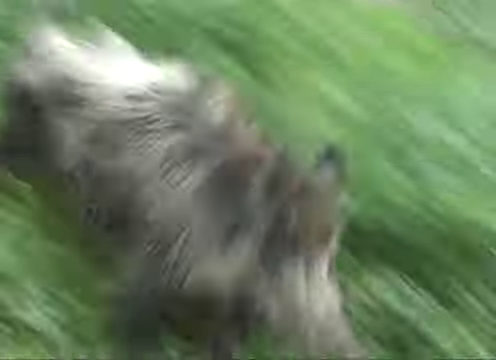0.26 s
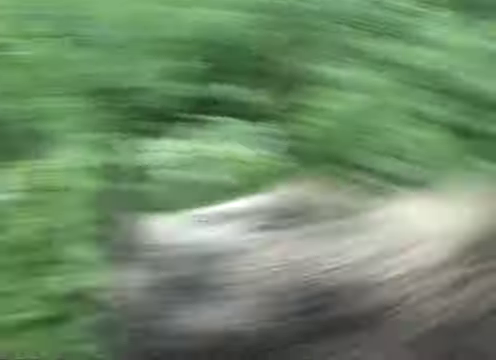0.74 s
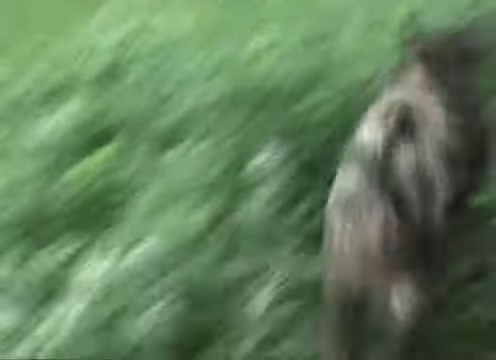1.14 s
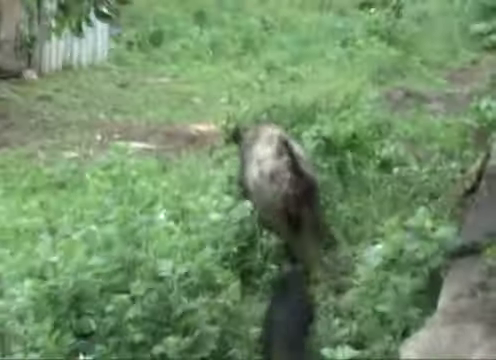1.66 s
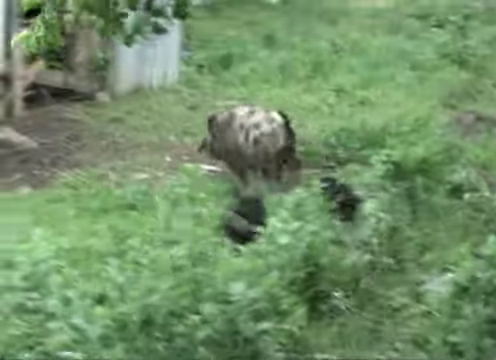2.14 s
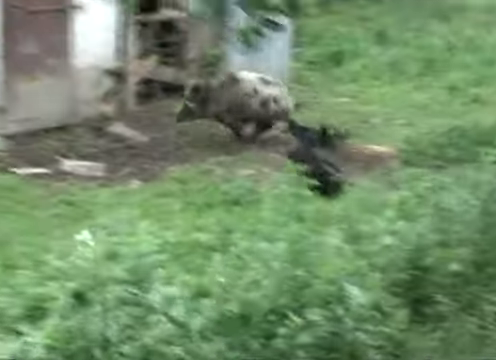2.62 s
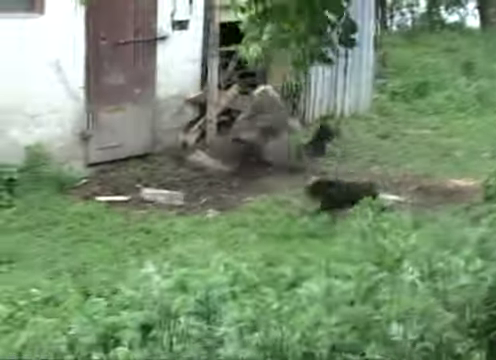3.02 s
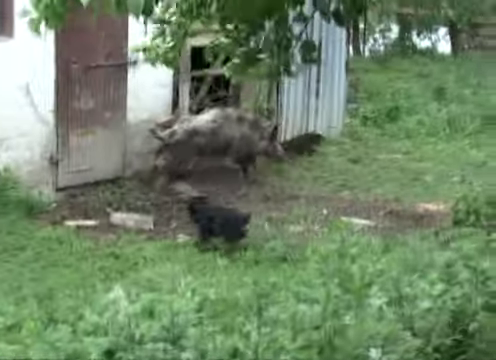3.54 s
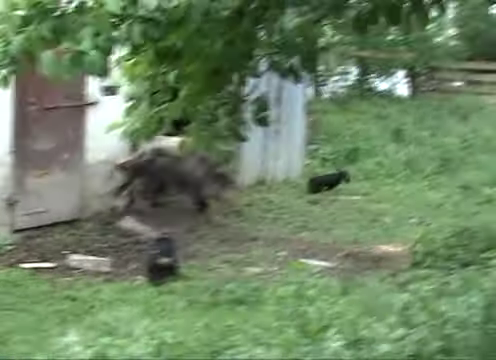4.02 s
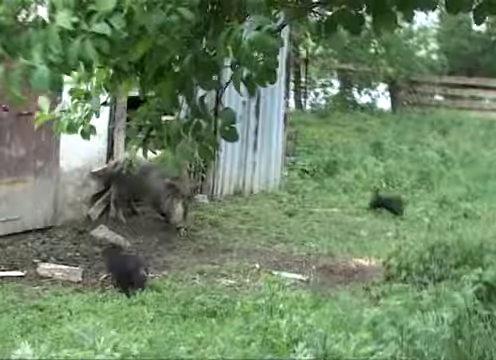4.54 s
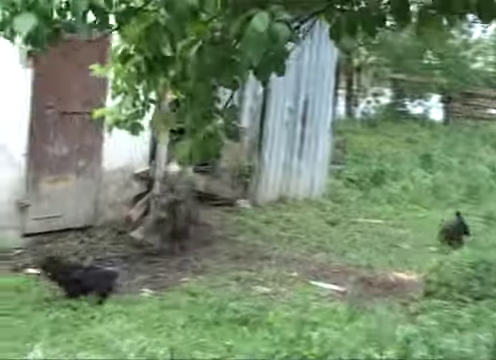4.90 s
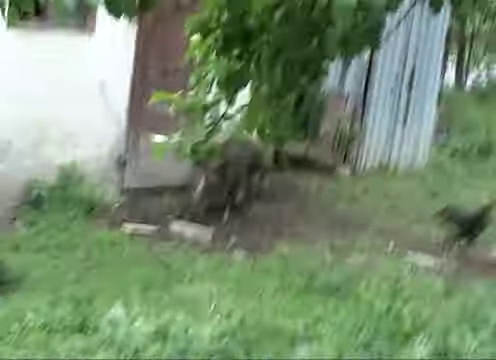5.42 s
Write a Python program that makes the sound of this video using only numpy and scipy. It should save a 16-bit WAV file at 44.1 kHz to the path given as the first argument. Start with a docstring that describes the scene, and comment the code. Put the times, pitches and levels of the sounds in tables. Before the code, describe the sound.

Outdoors in a weedy farmyard, a boar pushes through plants close to a handheld stereo microphone with crisp rustles and swishes that thin out as it runs off. Two small dogs bark, first in clear high yaps, then mixed with hoarse woofs about twice a second, echoing faintly off sheds. Low wind buffets and a few soft bumps sit over a steady background murmur.

```python
"""Wind buffets the microphones and weeds rustle close by as a boar pushes through them, then runs off.
Two small dogs bark at it in a weedy yard: one in gliding harmonic yaps and yelps with a rasp of air,
the other in hoarse woofs, a chest tone under irregular pulses ringing through the throat.
Sheds and near walls echo the barks; soft bumps are short low sines, and wind, murmur and leaves are coloured noise."""
import sys
import numpy as np
from scipy import signal
from scipy.fft import rfft, irfft, next_fast_len
from scipy.io import wavfile
from scipy.ndimage import map_coordinates

SR = 44100
rng = np.random.default_rng(int(sys.argv[2]) if len(sys.argv) > 2 else 0)


def to_wav(sig):
    """Store sig (one row per channel, or 1-D mono) as 16-bit WAV at the path in sys.argv[1].

    Samples outside -1..1 are clipped; the rate is SR.
    """
    pcm = np.clip(np.atleast_2d(sig), -1, 1) * 32767
    pcm = np.round(pcm).astype(np.int16)
    wavfile.write(sys.argv[1], SR, pcm.T)  # frames by channels


N = 249606  # length in samples


def amp(db):
    """Decibels to linear gain."""
    return 10 ** (np.asarray(db) / 20)


def unit(x):
    """Scale a signal to an RMS of one."""
    return x / np.sqrt(np.mean(np.abs(x) ** 2) + 1e-20)


def along(points, hz):
    """Read (frequency_hz, value) points on a log-frequency axis."""
    f, v = np.transpose(points)
    return np.interp(np.log(hz + 1), np.log(f + 1), v)


def over_time(points):
    """Read (time_s, value) points at every sample of the scene."""
    return np.interp(np.arange(N) / SR, *np.transpose(points))


def wobble(rate, size=N):
    """A smooth random curve with `rate` knots a second, at most 2000."""
    knots = rng.standard_normal(int(size / SR * 2000) + 4)
    return map_coordinates(knots, [np.arange(size) * min(rate, 2000) / SR])


def filtered(x, response):
    """Shape x by a gain or complex response of frequency."""
    m = next_fast_len(x.shape[-1] + 8192)
    spectrum = rfft(x, m) * response(np.fft.rfftfreq(m, 1 / SR))
    return irfft(spectrum, m)[..., :x.shape[-1]]


# Left-right likeness of diffuse sound: frequency_hz, correlation (0 to 1)
LIKENESS = [(60, 0.82), (500, 0.99), (2000, 0.68), (4000, 0), (15000, 0.16)]


def paired(pair, spectrum):
    """Colour two unrelated signals and mix them to the left-right likeness of the yard."""
    def response(hz):
        turn = np.arccos(np.clip(along(LIKENESS, hz), -1, 1)) / 2
        return amp(along(spectrum, hz)) * [np.cos(turn), np.sin(turn)]

    mid, side = filtered(pair, response)
    return unit(np.array([mid + side, mid - side]))


# Wind on the microphone ports, before its random flutter: time_s, level_db
GUSTS = [(0.0, -48), (0.05, -38.5), (0.24, -26.5), (0.27, -40), (0.61, -34.5), (0.9, -53), (2.22, -43),
         (2.38, -58), (2.74, -42.5), (3.14, -50), (3.66, -41.5), (3.67, -51.5), (4.78, -31), (5.04, -36.5),
         (5.36, -34.5), (5.66, -38)]
# Relative colour of the wind noise: frequency_hz, level_db (per Hz)
WIND_COLOUR = [(12, -29), (20, -9.5), (76, -9), (242, -24), (327, -35), (400, -26), (520, -61), (880, -120)]


def wind():
    """Low noise swells and flutters as gusts push on the ports."""
    level_db = over_time(GUSTS) + 3 * wobble(12)
    return amp(level_db) * paired(rng.standard_normal((2, N)), WIND_COLOUR)


# Relative colour of the background murmur: frequency_hz, level_db (per Hz)
MURMUR_COLOUR = [(88, -7.5), (150, -7.5), (269, -4.5), (384, 0), (738, -1.5), (927, -0.5), (1730, -0.5),
                 (1810, -2.5), (4500, -9.5), (5850, -12.5), (9900, -120)]


def murmur():
    """A gently wavering bed of broad noise around -39 dB."""
    level_db = -39 + 2 * wobble(10)
    return amp(level_db) * paired(rng.standard_normal((2, N)), MURMUR_COLOUR)


# Rustle, fading as the boar runs off, before its random stir: time_s, level_db
RUSTLE = [(0.0, -35.5), (1.18, -38.5), (1.5, -36), (2.57, -40.5), (2.79, -40.5), (3.01, -42), (4.62, -42.5),
          (4.92, -44), (5.66, -42)]
# Relative colour of rubbing leaves: frequency_hz, level_db (per Hz)
LEAF_COLOUR = [(1180, -22.5), (2000, -13), (2240, -9.5), (2500, -9), (3100, -6), (3780, -5), (4720, -2),
               (6380, -5), (8190, -6.5), (15600, -22.5)]
# Stems swished or snapped: time_s, level_db (before the swell), tilt_db (per octave), fade_s (to -60 dB)
SWISHES = [(0.049, -9, -5, 0.17), (0.192, -5.5, 3.5, .08), (.29, -12.5, 7, 0.054), (0.385, -7.5, -2.5, .1),
           (.447, -6, 0, 0.2), (.558, -6, -0.5, 0.09), (0.628, -13, 6, 0.056), (0.718, -10, -7, 0.19),
           (.778, -11, -12, .11), (0.832, -11.5, 1.5, 0.19), (1.031, -17, -5, 0.023), (1.09, -13, 9, 0.11),
           (1.292, -3, 3, .066), (1.38, -7, -3, 0.21), (1.517, -9, 1, 0.058), (1.689, -12.5, 0.5, .1),
           (2.377, 5, -6, 0.015), (2.3878, -2, -14.5, 0.069), (2.5985, -7, -7.5, 0.034),
           (3.2745, -12.5, -2, 0.16), (3.599, -15, 0, 0.15), (4.2, -11.5, -7, 0.17),
           (4.421, -10, -19.5, 0.088), (5.302, -11.5, -25, 0.15)]
TOP_END_DB, TOP_END_GROWS = -56, 2.2  # mean level of the top end; its dB change per dB of rustle


def weeds():
    """Leaves rub in dense ticks, duller as they fade, with louder swishes where stems are pushed aside."""
    ticks = amp(1.07 * np.array([wobble(900), wobble(900)]))
    hiss = paired(rng.standard_normal((2, N)) * ticks, LEAF_COLOUR)
    top = filtered(hiss, lambda hz: 1 / (1 + (10000 / (hz + 1)) ** 8))
    stir = amp(1.3 * wobble(9))
    level_db = over_time(RUSTLE)
    # the top end fades faster than the rustle
    top_db = TOP_END_DB + TOP_END_GROWS * (level_db - level_db.mean())
    out = stir * (amp(level_db) * (hiss - top) + amp(top_db) * unit(top))
    t = np.arange(SR // 5) / SR
    for time_s, db, tilt_db, fade_s in SWISHES:
        # the tilt pivots at 6 kHz and stays level below 1.5 kHz
        colour = [(hz, level + tilt_db * np.log2(max(hz, 1500) / 6000)) for hz, level in LEAF_COLOUR]
        crackle = amp(2.2 * wobble(590, size=len(t)))
        burst = paired(rng.standard_normal((2, len(t))) * crackle, colour)
        fade = max(fade_s, .005)
        swell = amp(-60 * t / fade) * (1 - np.exp(-t / (.3 * fade))) ** 2
        # start early, so the swell crests near its listed time
        part = out[:, round((time_s - .16 * fade_s) * SR):][:, :len(t)]
        part += (amp(db) * swell * burst)[:, :part.shape[1]]
    return out


# Where the barking dog stands: time_s, left_right_db, left_lag_s, shed_echo_delay_s, echo_db
DOG_PLACES = [(.5, -4, .00005, 0.098, -20), (1.304, 1, 0, 0.11, -34), (1.698, -2.5, .00005, 0.098, -23),
              (2.251, -0.5, -.00004, 0.15, -19), (2.698, 0.5, -.00003, 0.1, -50.5),
              (3.4, -3.5, .00009, 0.15, -21.5), (4.132, 2, -.00003, .13, -22.5),
              (4.599, -0.5, 0, 0.095, -23), (5.399, -1.5, .0001, 0.087, -36)]


def place_call(out, start, sound):
    """Set a call between the ports by level and lag, and add its side-swapped echo off the shed front."""
    s, *cols = np.transpose(DOG_PLACES)
    pan_db, lag_s, delay_s, echo_db = (np.interp(start / SR, s, c) for c in cols)
    half = np.array([[.5], [-.5]])
    pair = filtered(sound, lambda hz: amp(pan_db * half) * np.exp(-2j * np.pi * hz * lag_s * half))
    out[:, start:start + len(sound)] += pair
    late = out[:, start + round(delay_s * SR):][:, :len(sound)]
    late += amp(echo_db) * pair[::-1, :late.shape[1]]


CLOSED_HZ, MOUTH_Q, MOUTH_STEEPNESS = 613, 3.1, 1.52  # moving mouth resonance
UPPER_WIDTH_HZ = 1220


def mouth(hz, centre_hz, tilt_db, upper_hz, upper_db):
    """Gain of the fold spectrum through the moving mouth resonance and the upper one."""
    def ring(c, w):
        return c * w / np.abs(c * c - hz * hz + 1j * hz * w)

    moving = ring(centre_hz, centre_hz / MOUTH_Q) ** MOUTH_STEEPNESS
    upper = amp(upper_db) * ring(upper_hz, UPPER_WIDTH_HZ) ** 2
    return (moving + upper) * amp(tilt_db * np.log2(hz / 1000))


def call(rows):
    """First sample, soft-edged gate and per-sample columns of one call."""
    s, *cols = np.transpose(rows)
    t = np.arange(s[0], s[-1], 1 / SR)
    gate = np.clip(np.minimum(t - s[0], s[-1] - t) / .004, 0, 1)
    return round(s[0] * SR), gate, [np.interp(t, s, c) for c in cols]


# Clear yaps, yelps and whines, a list of points per call:
# time_s, pitch_hz, level_db, mouth_opening_octaves (resonance over closed), rasp_db (relative to voice)
CLEAR_CALLS = [
    [(.48, 550, -33, 0.038, -3), (.496, 604, -28, 3.64, -28), (.52, 647.7, -15.5, 0.94, -14),
     (.526, 735.5, -18, 1.03, -6), (.559, 818, -20.5, 0.46, -17), (.591, 717, -22.5, 0.4, -5),
     (.62, 597, -33, 0, -7)],
    [(.81, 491, -43, .8, -17), (.83, 576.5, -28, 0.68, -32), (.85, 649, -14, 0.094, -9),
     (.875, 643, -16.5, 0.35, -25), (.89, 616.5, -19.5, 0.97, -1), (.915, 614, -19.5, 0.75, 0),
     (.942, 585, -26.5, 0.25, -8.5), (.96, 563, -19, 0.019, -1)],
    [(1.18, 432, -49, 0.18, -3), (1.216, 632.3, -26, 0.9, -6.5), (1.24, 680, -12.5, 0.0058, -14.5),
     (1.255, 651, -21, 0.99, -2), (1.276, 612, -20, 1.83, -1), (1.3, 601, -19.5, 0.37, -1)],
    [(1.305, 900, -42, .6, -2), (1.311, 872, -10.5, 0.61, -11), (1.317, 814, -6.5, 0.49, -26),
     (1.327, 745, -15.5, .3, -8), (1.335, 715, -10, 0.26, -10), (1.35, 683, -17.5, 0.27, -3),
     (1.36, 675, -27, .3, -1), (1.37, 660, -12, 0.56, -36), (1.39, 438, -29, 1, 20.5)],
    [(1.63, 387, -48, 0, -18), (1.658, 559.5, -32.5, 0.86, -5), (1.678, 639, -17.5, 0.87, -16),
     (1.688, 671, -29.5, 0.93, -1), (1.7, 678, -14, 0.82, -27), (1.72, 675, -14.5, .1, -16),
     (1.742, 606, -21, 1, -11.5), (1.77, 457, -41, 0.042, 22)],
    [(2.16, 503.5, -46, 0.64, -6), (2.195, 628, -30.5, 1.86, 8), (2.21, 654, -15, 0.84, -55),
     (2.228, 703, -13.5, 1.1, -26), (2.25, 720, -8.5, 1.23, -23), (2.263, 723, -13.5, 1.36, -30),
     (2.278, 717.6, -9.5, 1.5, -19), (2.31, 696.4, -15.5, 1, -0.5), (2.34, 690, -25.5, 2.9, 4)],
    [(2.56, 425, -41, 1.2, 6), (2.585, 495, -24.5, 1.03, -4), (2.602, 550, -9, 1.08, -15),
     (2.615, 588, -13.5, 1.37, -11), (2.644, 627, -11, 1.22, -32), (2.69, 622.6, -12.5, 1.27, -23),
     (2.705, 613, -18.5, 1.48, -5), (2.75, 614, -25.5, 0.86, -6)],
    [(2.8, 450.7, -16.5, 0.23, -19), (2.828, 497.6, -25.5, 1.5, -30.5), (2.874, 568.5, -11, 0.61, -20),
     (2.902, 569.3, -16.5, .9, -14), (2.925, 521.3, -17, 0.99, -10), (2.945, 415.6, -25, 0.83, -6),
     (2.965, 390, -31.5, 0.51, 7)],
    [(4.055, 440.4, -21.5, 0.51, 2), (4.085, 520, -11, 1.2, -12), (4.11, 588.7, -18.5, 0.28, -6),
     (4.133, 610.6, -11, 0.076, -24), (4.155, 591, -14.5, 0.33, -25), (4.171, 578.5, -11.5, 2.6, -20),
     (4.19, 499, -31, 1.6, -26), (4.21, 412, -25, 0.45, -12)],
    [(4.425, 778, -23.5, 2, -22), (4.441, 804, -16, 1.6, -21), (4.463, 939, -11, 1.8, -9),
     (4.475, 1022, -12, 1.8, -14), (4.478, 1159, -15, 0.74, -17), (4.484, 1159, -9, 1.2, -28),
     (4.522, 1007, -14, 0.4, -2), (4.545, 968, -20.5, 2.1, -7)],
    [(4.546, 525, -21, 0.86, -1), (4.57, 590, -15, 0.92, -29), (4.592, 596.2, -13.5, 0.83, -22.5),
     (4.632, 514.6, -22.5, 0.74, 0), (4.66, 397, -26.5, .5, -8)],
    [(.11, 455, -39, 0, -4), (.136, 519, -41.5, 0, -14), (.166, 580, -25.5, 0, -7.5),
     (.248, 529.3, -38.5, 0, -3), (.27, 395, -29.5, 0, -28)],
    [(1.14, 1182, -50, 1.3, 3), (1.152, 1275, -23.5, 1.9, -44), (1.168, 1395, -27, 1.2, -20),
     (1.2, 1424, -28.5, 1.2, -16)],
    [(5.04, 753, -34, .3, -13), (5.075, 742, -27.5, 0.38, -24), (5.12, 754, -29, 0.54, -22),
     (5.175, 776, -40, 0.37, -24), (5.21, 734, -54, 0.1, -18)],
    [(5.32, 692, -33, .3, 5), (5.346, 767, -34, .3, 0), (5.362, 766, -34, .3, 2), (5.39, 760, -21, .3, -16)],
]
# Head and throat, call by call: tilt_db (per octave, as the head turns away), upper_resonance_hz,
# upper_resonance_db, bright_rasp_db (relative to voice)
HEAD_AND_THROAT = [(-2.5, 1820, 3, -22), (-2, 1780, -7.5, -24), (-5, 1800, -7, -37), (-2, 2650, -15.5, -26),
                   (-6, 1930, -13.5, -24), (1.5, 2200, -5, -20), (3, 1930, -15, -22.5),
                   (-0.5, 2180, -14.5, -21), (-1.5, 1700, -2, -24.5), (3, 3150, -15, -21),
                   (-0.5, 1940, -2, -22.5), (-5, 2400, -9, -28), (-10, 2500, -16, -31),
                   (-9, 1900, -22, -30), (-1, 2800, -10, -37)]
# Moments with tones halfway between the harmonics: time_s, half_length_s, level_db (against the harmonics)
HALFWAY_MOMENTS = [(0.559, 0.015, 1.5), (1.28, 0.03, -2), (1.766, 0.017, 4), (2.225, 0.011, 5.5),
                   (2.83, 0.012, 2), (4.21, 0.013, 0), (4.513, 0.046, -6)]
# Relative colour of the breath noise in a yap: frequency_hz, level_db
RASP_COLOUR = [(250, -71), (450, -0.5), (700, 3), (1300, 4.5), (2000, 3), (2600, -26), (3500, -39)]
# Relative colour of the bright breath hiss, in yaps and woofs: frequency_hz, level_db
BRIGHT_COLOUR = [(1800, -62), (2400, 6), (3500, -4.5), (4000, -8), (5500, -10.5), (7200, -8),
                 (10000, -15.5), (14000, -45.5)]


def clear_dog():
    """Vocal folds in step give harmonics, at moments with tones halfway between; leaking air rasps once a cycle."""
    out = np.zeros((2, N))
    order = np.arange(1, 10)[:, None]
    halfway = order[:2] + .5
    for rows, (*shape, bright_db) in zip(CLEAR_CALLS, HEAD_AND_THROAT):
        start, gate, (hz, level_db, opening, rasp_db) = call(rows)
        n = len(gate)
        t = (start + np.arange(n)) / SR
        phase = 2 * np.pi * np.cumsum(hz * (1 + .009 * wobble(150, size=n))) / SR
        # the more air leaks, the less even the cycles
        phase += .5 * np.minimum(amp(rasp_db), 1) * wobble(300, size=n)
        centre_hz = CLOSED_HZ * 2 ** opening
        gains = mouth(order * hz, centre_hz, *shape)
        half_gains = mouth(halfway * hz, centre_hz, *shape)
        flutter_db = np.array([5 * np.tanh(.8 * wobble(70, size=n)) for k in order])
        partials = np.sin(order * phase + 2 * np.pi * rng.random(order.shape))
        harmonics = np.sum(gains * amp(flutter_db) * partials, axis=0)
        half_level = sum(amp(db) * np.exp(-((t - s) / width) ** 2) for s, width, db in HALFWAY_MOMENTS)
        half_tones = half_level * np.sum(half_gains * np.sin(halfway * phase), axis=0)
        # divide out the overall mouth gain, so level_db sets the loudness
        voice = (harmonics + half_tones) / np.linalg.norm(gains, axis=0)
        air = rng.standard_normal(n) * (1 + np.cos(phase))
        rasp = unit(filtered(air, lambda f: amp(along(RASP_COLOUR, f))))
        bright = unit(filtered(air, lambda f: amp(along(BRIGHT_COLOUR, f))))
        sound = np.sqrt(2) * voice + amp(rasp_db) * rasp + amp(bright_db) * bright
        place_call(out, start, gate * amp(level_db) * sound)
    return out


# Decay of the yard's diffuse tail: frequency_hz, t60_s
TAIL_DECAY = [(400, .34), (1500, .42), (4000, .28), (10000, .15)]
# Near walls: delay_s, level_db
NEAR_WALLS = [(.011, -40.5), (0.026, -25.5), (.06, -47.5)]


def yard(x):
    """A few near walls and a diffuse tail, drawn afresh every third of a second as the dogs move about."""
    walls = sum(amp(db) * np.pad(x, (round(s * SR), 0))[:N] for s, db in NEAR_WALLS)
    out, step = np.zeros((2, N + 2 * SR)), SR // 3
    for start in range(0, N, step):
        hz, t, z = signal.stft(rng.standard_normal((2, SR // 2)), SR, nperseg=256)
        decay = amp(-60 * t / along(TAIL_DECAY, hz)[:, None])
        tail = signal.istft(z * decay, SR, nperseg=256)[1]
        # an almost flat colour: only the left-right likeness matters here
        tail = paired(tail, [(20, 0.029), (20000, 0)]) / np.sqrt(tail.shape[1])
        wet = signal.fftconvolve(x[None, start:start + step], tail, axes=1)
        out[:, start + 400:][:, :wet.shape[1]] += wet
    return walls + amp(-10.0) * out[:, :N]


# Hoof and handling bumps: start_s, level_db (before the soft attack), pitch_hz, fade_s (to -60 dB)
BUMPS = [(0.208, -23, 117, 0.05), (1.309, -25, 40.4, 0.04), (1.882, -25, 63, 0.074), (2.103, -30, 140, 0.1),
         (3.47, -37, 65.4, 0.066)]


def thuds():
    """Soft low bumps: sines that die away in a few cycles."""
    out, t = np.zeros(N), np.arange(SR // 5) / SR
    for s, db, hz, fade in BUMPS:
        attack = 1 - np.exp(-t / 0.0014)
        out[round(s * SR):][:len(t)] += amp(db - 60 * t / fade) * np.sin(2 * np.pi * hz * t) * attack
    return out


# Hoarse woofs; the first is the low rising start of a clear yap:
# start_s, rise_s, hold_s, chest_tone_hz, chest_tone_db, octave_db (relative to chest tone),
# throat_db, throat_lag_s, throat_hold_s, throat_tilt_db (per group)
HOARSE_WOOFS = [(2.719, 0.043, 0.063, 412, -25, 5, -26, -0.035, 0.11, 1),
                (3.126, .03, 0.089, 455, -23.5, -27, -17, 0.029, 0.047, -1),
                (3.531, 0.034, 0.092, 430.8, -25.5, -6, -16.5, 0.017, 0.047, 2.5),
                (3.936, 0.024, 0.11, 450.7, -20, -6, -19, 0.016, 0.036, 3),
                (4.408, 0.033, 0.09, 425, -24.5, -12, -24.5, -0.014, 0.044, 3),
                (4.872, 0.035, 0.058, 422, -23, -16, -20.5, 0.045, 0.025, 0),
                (5.285, 0.058, 0.048, 477, -61, 6, -35, -0.008, 0.094, 0),
                (5.354, 0.016, 0.086, 456, -25.5, -12, -17, 0.044, 0.013, 0)]
# Throat resonances in a low, middle and high group: centre_hz, width_hz
THROAT_GROUPS = [
    [(590, 440)],
    [(1140, 176)],
    [(1650, 740), (2020, 640)],
]
GROUP_DB = [-2.5, 0, -1]  # low, middle, high, before the tilt of each woof
RISE_DB, FALL_DB_PER_S = 18.5, 271
SAG_PER_S = .35  # fraction of pitch; the chest tone sinks as the woof runs out


def throat_ring(f, group):
    """Squared resonances of one throat group, rolled off above about 2.3 kHz."""
    rings = sum((1j * f * w / (c * c - f * f + 1j * f * w)) ** 2 for c, w in group)
    return rings / (1 + (f / 2350) ** 10)


def push(t, rise, hold):
    """Breath pressure: a steady climb in dB, a hold and a steep fall."""
    climb_db = np.minimum(RISE_DB * (t / rise - 1), 0)
    return amp(climb_db - FALL_DB_PER_S * np.maximum(t - rise - hold, 0))


def hoarse_dog():
    """A sinking chest tone under irregular fold pulses that speed up at the onset and ring the throat."""
    out, n = np.zeros((2, N)), round(.3 * SR)
    t = np.arange(n) / SR
    for s, rise, hold, hz, tone_db, octave_db, throat_db, lag, throat_hold, tilt_db in HOARSE_WOOFS:
        glide_hz = hz * (1 - SAG_PER_S * (t - rise - hold / 2))
        jitter = .05 * wobble(120, size=n) + .04 * wobble(30, size=n)
        phase = 2 * np.pi * np.cumsum(glide_hz * (1 + jitter)) / SR
        tone = np.sin(phase) + amp(octave_db) * np.sin(2 * phase)
        tone *= amp(tone_db + 5 * np.tanh(wobble(60, size=n)))
        rate_hz = 575 * (1 - .25 * np.exp(-t / 0.037))
        cycles = np.cumsum(rate_hz * (1 + 0.12 * wobble(250, size=n))) / SR
        pulses = np.diff(np.floor(cycles), prepend=0) * amp(2.24 * wobble(403.0, size=n))
        pulses += .06 * rng.standard_normal(n)  # turbulent air between the pulses
        rough = 0
        for k, group in enumerate(THROAT_GROUPS):
            rung = unit(filtered(pulses, lambda f: throat_ring(f, group)))
            rough = rough + amp(GROUP_DB[k] + tilt_db * (k - 1.5)) * rung
        hiss = amp(tilt_db - 19.5) * unit(filtered(pulses, lambda f: amp(along(BRIGHT_COLOUR, f))))
        chest = np.sqrt(2) * tone * push(t, rise, hold)
        throat = amp(throat_db) * push(t - lag, rise, throat_hold) * (rough + hiss)
        place_call(out, round(s * SR), (chest + throat) * np.minimum(t / .004, 1))
    return out


def scene():
    """Both dogs with the yard's answer, over wind, murmur, weeds and bumps."""
    dogs = clear_dog() + hoarse_dog()
    return wind() + murmur() + weeds() + dogs + yard(dogs.mean(axis=0)) + thuds()


TOP_HZ = 15750  # band limit


def record(dry):
    """The loudest peaks round off towards full scale; then everything above the band limit is cut."""
    soft = dry / (1 + np.abs(dry) ** 8) ** (1 / 8)
    return filtered(soft, lambda hz: hz < TOP_HZ)


dry = scene()
out = record(dry)
to_wav(out)
```